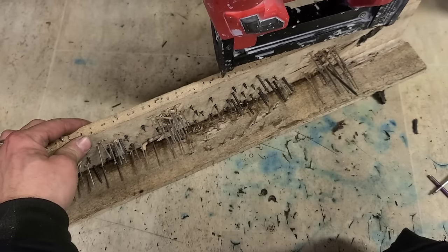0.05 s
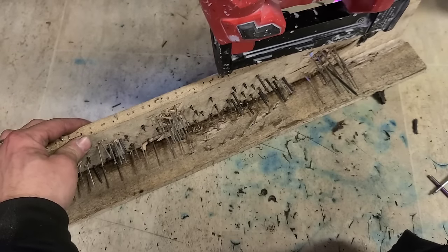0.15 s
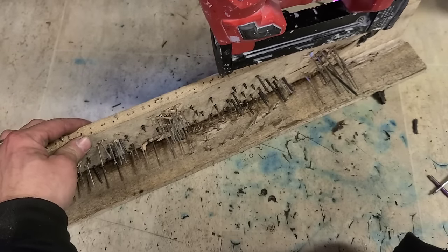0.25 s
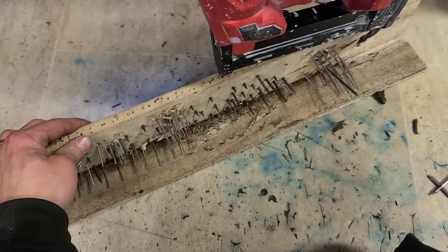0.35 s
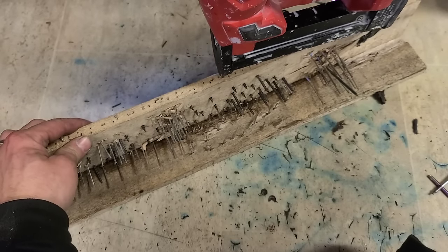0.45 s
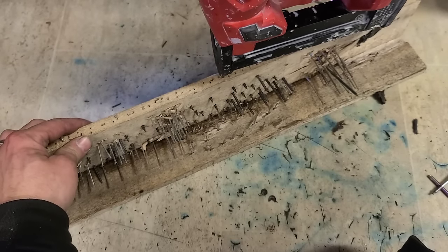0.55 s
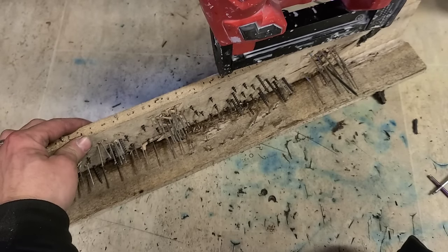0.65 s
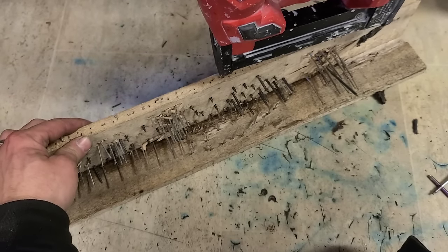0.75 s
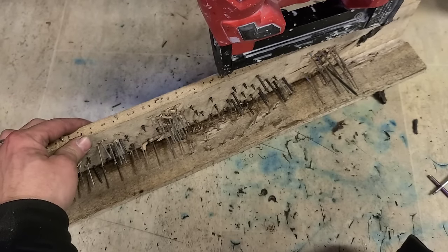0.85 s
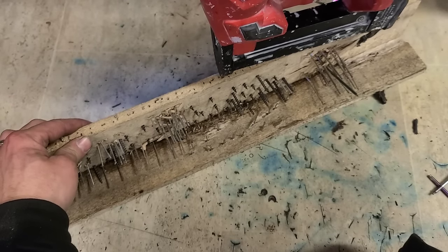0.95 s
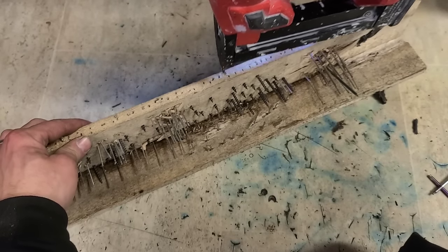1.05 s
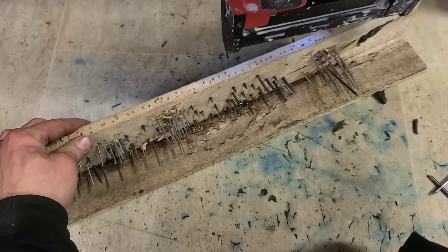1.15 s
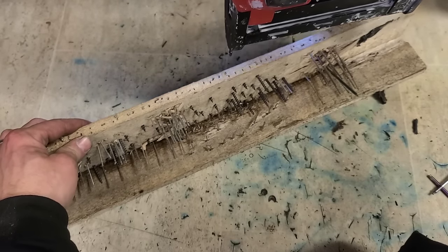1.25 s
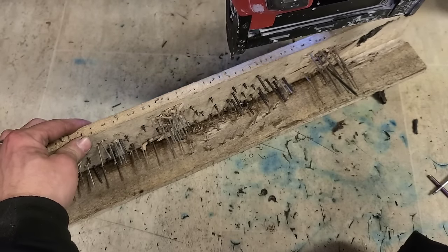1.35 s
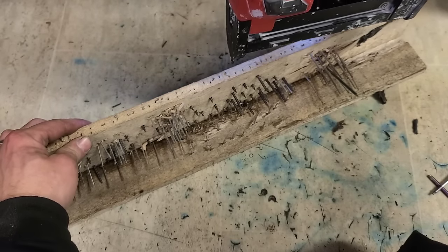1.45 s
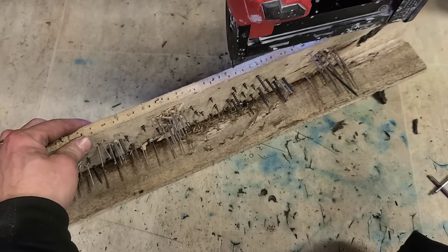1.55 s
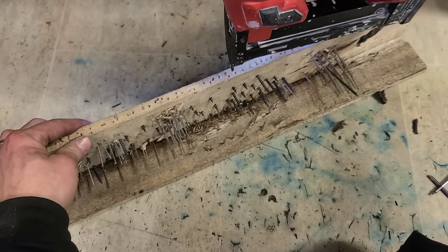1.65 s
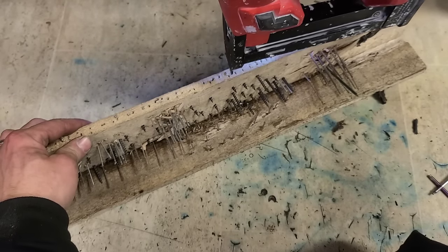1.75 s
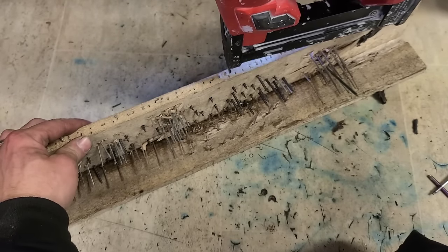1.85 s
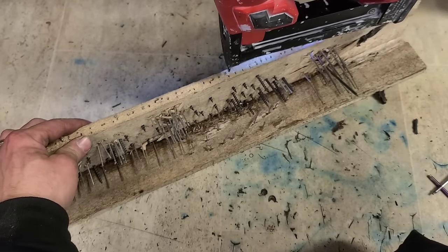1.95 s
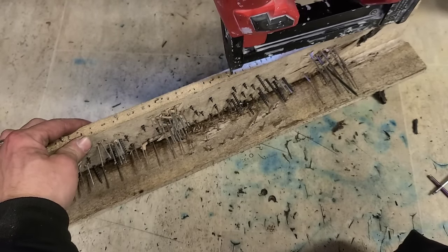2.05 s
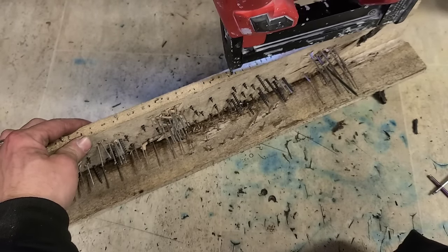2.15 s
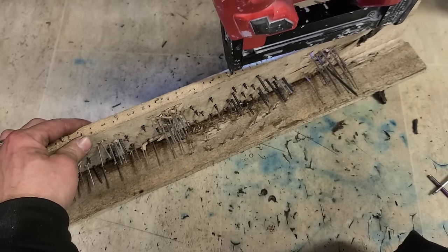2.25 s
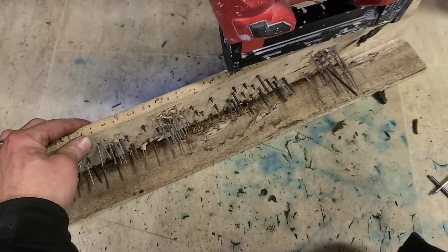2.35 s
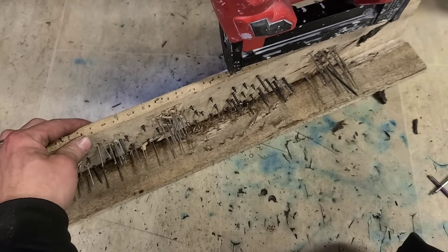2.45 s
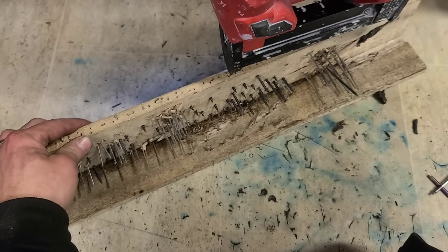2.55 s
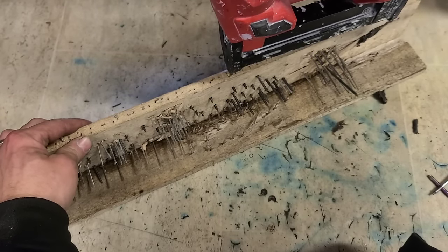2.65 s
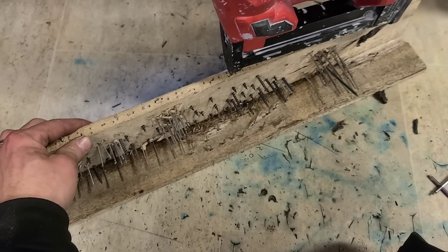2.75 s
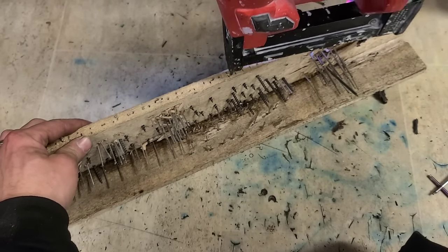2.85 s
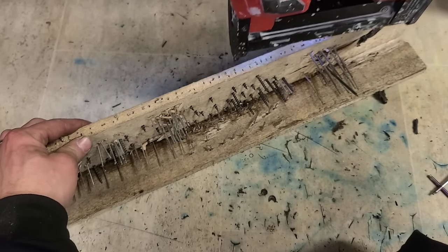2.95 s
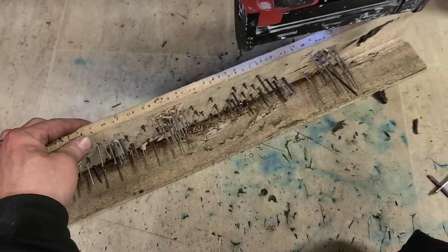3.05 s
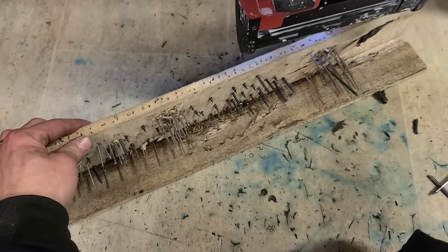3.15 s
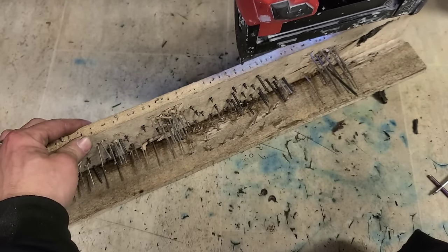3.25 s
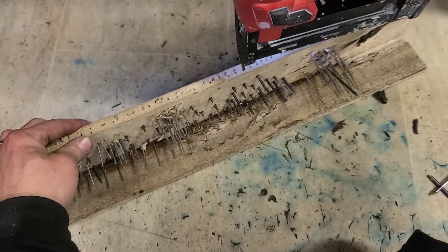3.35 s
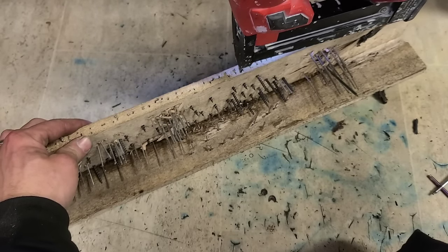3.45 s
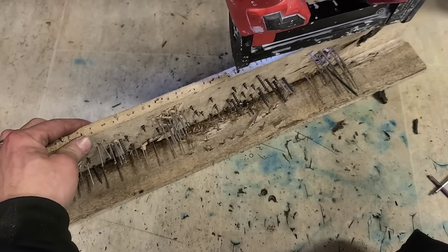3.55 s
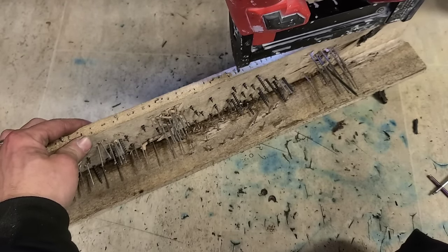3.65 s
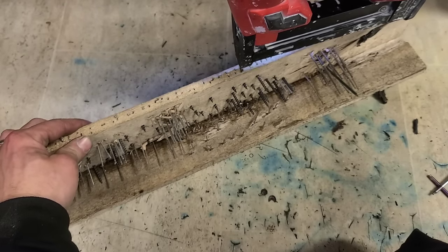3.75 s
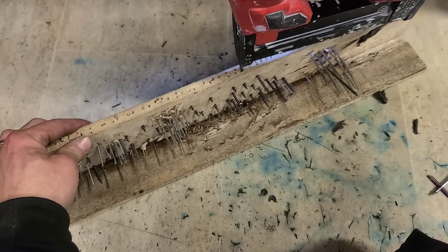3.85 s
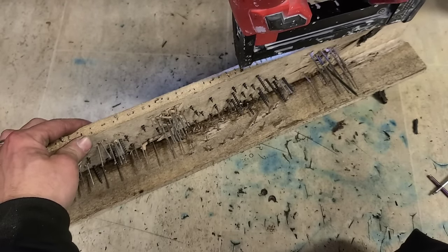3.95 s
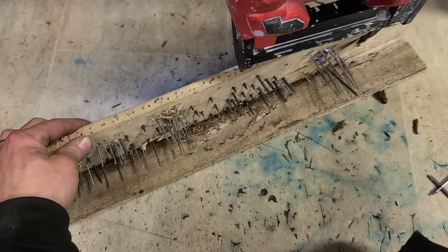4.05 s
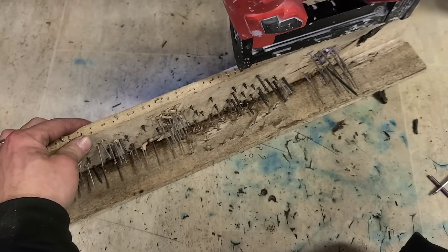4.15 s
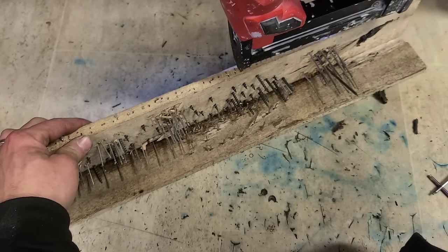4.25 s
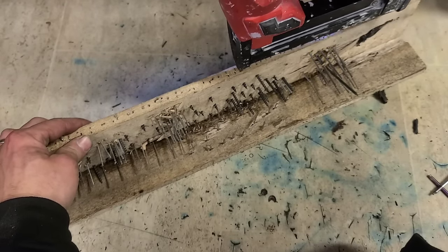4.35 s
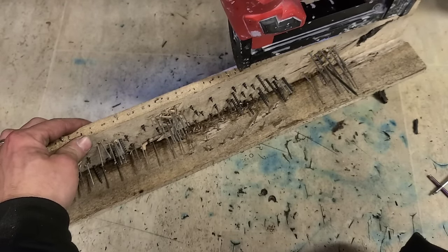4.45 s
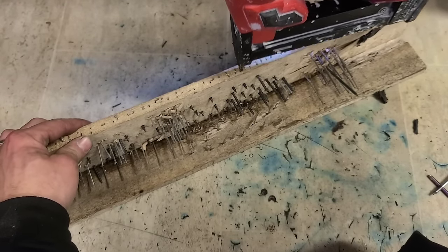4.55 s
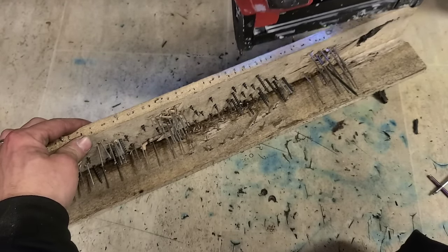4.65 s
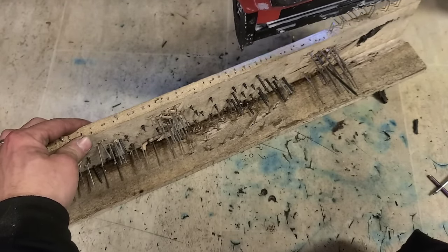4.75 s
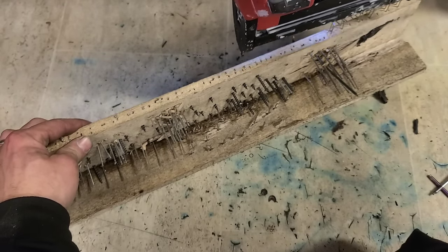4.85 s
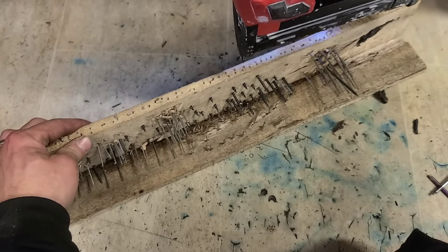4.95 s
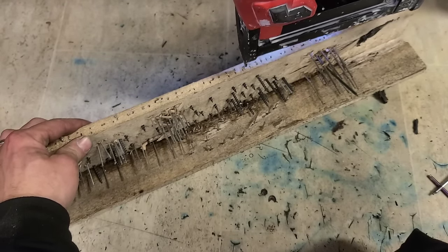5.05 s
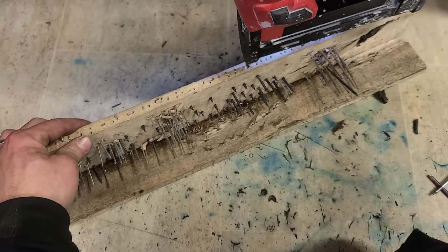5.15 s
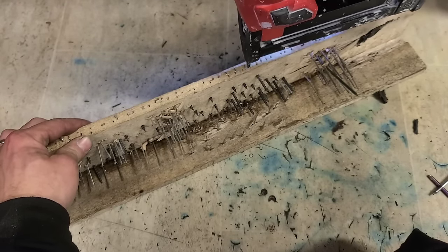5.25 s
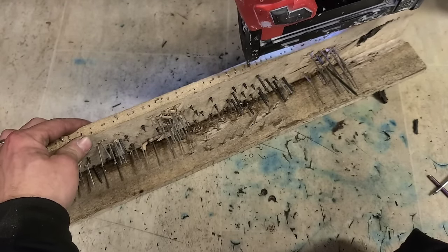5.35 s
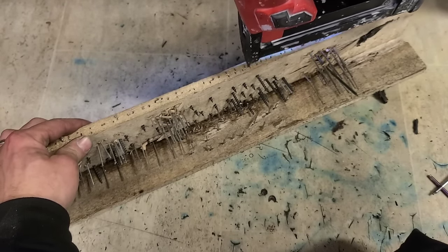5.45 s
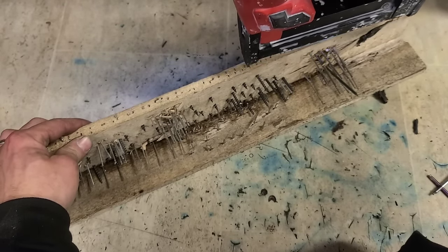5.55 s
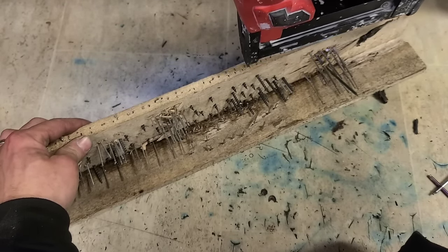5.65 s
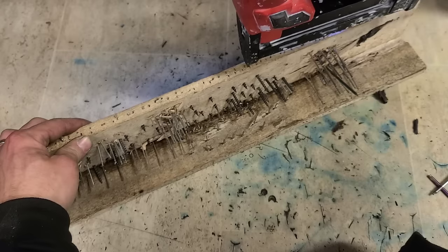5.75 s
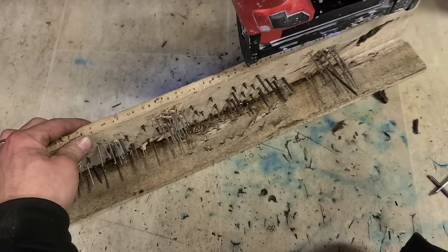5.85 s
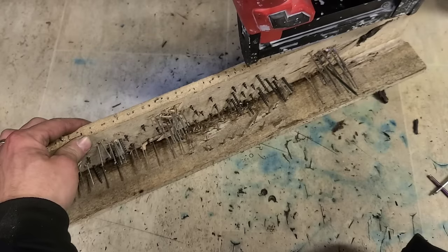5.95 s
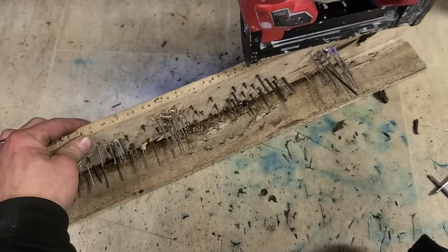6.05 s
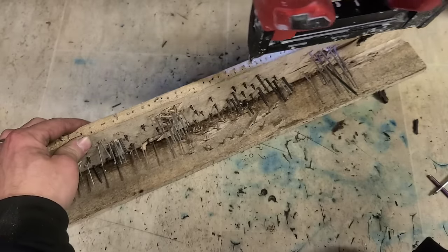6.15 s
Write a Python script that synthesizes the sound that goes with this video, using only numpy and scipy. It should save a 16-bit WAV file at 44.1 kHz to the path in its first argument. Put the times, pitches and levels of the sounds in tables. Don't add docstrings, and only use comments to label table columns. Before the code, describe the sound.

A cordless stapler works close to a stereo microphone in a workshop. Faint air noise, slightly stirred by a sleeve at first, and a distant fan hum run throughout. At 0.14 s the nose lands on a board with a low bench boom and crisp clicks; small ticks precede the first and loudest shot at 0.72 s. It is a tight double metallic crack with rattle and a deep thud, then a gear whirr drooping and straining for about 0.15 s, ending in a tiny catch and thin steel ring. The trigger snaps back at 1.04 s. A pause, then a firm clattering landing at 2.29 s, shot at 2.61 s, release click at 2.9 s. A softer landing at 4.0 s leads to a shot at 4.3 s and click at 4.56 s. The lightest landing at 5.48 s precedes the last shot at 5.8 s and a final click at 6.12 s. Each shot leaves a short room echo.

```python
import sys
import numpy as np
from scipy import signal
from scipy.fft import rfft, irfft
from scipy.io import wavfile
from scipy.ndimage import uniform_filter1d

SR = 44100
rng = np.random.default_rng(int(sys.argv[2]) if len(sys.argv) > 2 else 0)


def output_pcm(signal):
    pcm = np.clip(np.atleast_2d(signal).T, -1, 1) * 32767
    wavfile.write(sys.argv[1], SR, np.round(pcm).astype(np.int16))


def magnitude_from_level(level_db):
    exponent = np.asarray(level_db, float) / 20
    return 10 ** exponent


N = 273854
LEAD_IN = .08


# (driver release [s], level [dB], left-right [dB])
SHOTS = [
    (.722, -1.5, 0),
    (2.608, -3, -1),
    (4.297, -3.5, -0.5),
    (5.801, -4, -0.5),
]


def fire_shots(tool, boom):
    for s, db, pan_db in SHOTS:
        add(tool, s - LEAD_IN, magnitude_from_level(db) * sides(pan_db) * mechanism())
        strike_steel(tool, s, db)
        jolt_bench(boom, s, db)


# (frequency [Hz], level [dB per Hz])
RATTLE = [(500, -28), (800, -5.5), (1040, -6.5), (1400, -3), (1990, -2), (2900, -4), (4360, -6.5),
          (6000, -10), (7800, -30)]
# (frequency [Hz], width [Hz], level [dB])
MAGAZINE = [(1335, 230, 0), (1440, 43, -2), (1711, 73, -4), (2220, 58, -3), (2490, 13, -4), (2810, 67, -2),
            (3110, 240, -2), (4510, 42, -8), (5640, 100, -8), (6260, 230, -8), (7220, 45, -9),
            (7630, 31, -12)]
# (frequency [Hz], level [dB per Hz])
HISS = [(2060, -30), (3500, 2), (4410, -7), (5080, -5), (6010, -6.5), (6660, -1), (9190, -8.5),
        (14900, -7.5), (16300, -32.5)]
# (time after release [s], rate [Hz])
MESH = [(.015, 748.8), (.04, 1301), (.06, 2001), (.08, 1780), (.125, 1630), (.142, 1572), (.164, 1550),
        (.18, 1243)]
# (frequency [Hz], width [Hz], level [dB])
HOUSING = [(1200, 500, -4), (1600, 1100, -4), (1760, 450, -5), (3250, 770, -1.5), (3870, 330, -8),
           (5650, 330, -2.5), (6570, 320, -1), (7880, 200, -2), (9600, 230, -6.5), (9000, 28000, -15)]


def mechanism():
    t = np.arange(-LEAD_IN, .202, 1 / SR)
    size = len(t)
    rattle, hiss, gear = effort(t)
    grit = magnitude_from_level(2.5 * wander(size, 30)) * magnitude_from_level(2.5 * wander(size, 150))

    def rattle_gain(hz):
        plates = sum(bell(hz, f, w) ** 2 for f, w, _ in MAGAZINE)
        return magnitude_from_level(read(RATTLE, hz)) * (1 + plates)

    out = rattle * grit * noise(size, rattle_gain)
    out += hiss * grit * noise(size, lambda hz: magnitude_from_level(read(HISS, hz)))

    growl = magnitude_from_level(-5) * np.clip(t / SURGE_END_S, 0, 1) ** 3 * magnitude_from_level(-START_SURGE_DB * (t < SURGE_END_S) / 2)
    out += gear * growl * noise(size, lambda hz: bell(hz, 380, 450) ** 2)

    mesh = np.interp(t, *np.transpose(MESH)) * (1 + .004 * wander(size, 150))
    turns = np.cumsum(mesh) / SR
    for k in range(1, 11):
        housing = sum(magnitude_from_level(db) * bell(k * mesh, f, w) ** 2 for f, w, db in HOUSING)
        wobble = magnitude_from_level(3.0 * wander((2, size), 400))
        phase = 2 * np.pi * k * turns
        out += gear * housing * wobble * np.array([np.cos(phase), np.sin(phase)])
    return out


START_SURGE_DB, SURGE_END_S = 9, .049
# (time after release [s], rattle [dB], air hiss [dB])
IMPACTS = [
    (.002, -15, -15.5),
    (.008, -11, -12.5),
    (.042, -13, -13),
    (.047, -8, -9),
    (0.0502, -11, -12),
    (.17, -28, -24),
]


def effort(t):
    fall = 3000
    stop_s, load_s, unload_s = .172, 0.13, 0.1625
    steady = hump(t, 0, 0.039, stop_s, fall, 1502)
    rush = hump(t, 0, .04, .04, 400.5, fall) * (t > 0)
    creep = hump(t, -55, 0, 0, 300, fall)
    rattle = creep + magnitude_from_level(-13) ** 2 * rush + magnitude_from_level(-23.5) ** 2 * steady
    hiss = creep * magnitude_from_level(-5.5) + magnitude_from_level(-18) ** 2 * rush + magnitude_from_level(-25.5) ** 2 * steady
    for s, rattle_db, hiss_db in IMPACTS:
        rattle = rattle + hump(t, rattle_db, s, s, 9001, fall)
        hiss = hiss + hump(t, hiss_db, s, s, 9001, fall)
    load_db = -26.5 + 158.5 * np.clip(t - load_s, 0, unload_s - load_s)
    load_db = load_db + START_SURGE_DB * np.clip((SURGE_END_S - t) / 0.0047, 0, 1)
    gear = hump(t, load_db, 0.031, unload_s, 1199.5, 1499)
    return np.sqrt([rattle, hiss, gear])


# (frequency [Hz], t60 [s], level [dB], polarity)
BLADE = [(1500, 0.033, 0, -1), (2070, .03, -3, 1), (1270, .04, -5, 1)]
# (time after release [s], level [dB])
BLADE_HITS = [
    (.007, -13),
    (.038, -15),
    (.0465, -9),
]
# (frequency [Hz], t60 [s], level [dB], polarity)
ROD = [(3230, .3, -3, 1), (3290, .25, -4, -1), (7880, .3, 0, 1), (7960, .28, -2, -1), (9420, .28, -3, 1)]
# (time after release [s], level [dB])
PINS = [
    (.124, -20.5),
    (.146, -23.5),
    (.167, -25),
]


def strike_steel(tool, s, db):
    blade, rod = ring(BLADE, .0002, .0004), ring(ROD, 1 / SR, .01)
    add(tool, s + .15, magnitude_from_level(db - 41) * np.array([rod, np.roll(rod, 2)]))
    for after, hit_db in BLADE_HITS:
        add(tool[0], s + after, magnitude_from_level(db + hit_db) * blade)
        add(tool[1], s + after + .00008, magnitude_from_level(db + hit_db) * blade)
    for after, pin_db in PINS:
        add(tool, s + after, pin_click(db + pin_db))


def pin_click(db):
    t = np.arange(1500) / SR
    envelope = magnitude_from_level(db - 60 * t / 0.083) * (1 - np.exp(-t / 0.00041))
    return envelope * noise(len(t), lambda f: bell(f, 13600, 3800) ** 2)


# (time after release [s], board level [dB], bench level [dB])
BLOWS = [
    (.039, -21.5, -40),
    (.047, -18.5, -7.5),
    (.158, -44, -49),
    (.178, -49, -23.5),
    (0.236, -54, -37),
]
# (frequency [Hz], t60 [s], level [dB], polarity)
JOLTED = [(52, .2, -8, 1), (78.7, .22, 0, 1), (99, .3, -14, 1), (108, .35, -19, -1), (131, .21, -4, 1),
          (157, .08, -2, 1), (161, .2, -6, -1)]
# (frequency [Hz], t60 [s], level [dB], polarity)
BOARD = [(210, 0.31, -5.5, 1), (300.7, 0.2, -2, -1), (378.4, 0.08, -0.5, 1), (492, 0.05, 0.5, -1),
         (520, 0.021, -4, 1), (705, 0.096, -9, 1)]
# (frequency [Hz], t60 [s], level [dB], polarity)
RECOIL = [(118, .04, 0, 1), (470, .04, -2, 1), (185, .65, -27, 1)]
# (frequency [Hz], t60 [s], level [dB], polarity)
SWAY = [(30.48, 1.2, 0.0021, 1), (35.15, 0.88, 0.00073, 1)]


def jolt_bench(boom, s, db):
    jolted, board = ring(JOLTED, 0.0026, 0.0091), ring(BOARD, .0006, 0.00057)
    recoil, sway = ring(RECOIL, .001, 0.0012), ring(SWAY, .004, .03)
    add(boom, s + .0403, magnitude_from_level(db) * (magnitude_from_level(-8) * recoil + magnitude_from_level(-31) * sway))
    for after, board_db, bench_db in BLOWS:
        add(boom, s + after, magnitude_from_level(db) * (magnitude_from_level(board_db) * board + magnitude_from_level(bench_db) * jolted))


# (frequency [Hz], t60 [s], level [dB], polarity)
PRESSED = [(56, .22, -1, 1), (64.4, .35, -10, -1), (76.3, .17, 0, -1), (89, .21, -13, 1),
           (129, .17, -16, -1), (185, .2, -26, 1)]
# (time [s], peak level [dB])
LANDINGS = [(0.056, -34), (0.141, -8.5), (0.594, -37), (0.658, -32), (1.046, -34), (2.081, -30.5),
            (2.291, -8), (2.561, -27.5), (2.906, -38.5), (3.817, -40), (3.93, -38.5), (4.007, -11.5),
            (4.258, -35), (4.572, -35.5), (5.337, -43), (5.409, -43), (5.482, -13.5), (5.55, -47),
            (5.718, -32), (6.117, -31.5)]


def set_down(boom, ticks):
    pressed, sway = ring(PRESSED, .004, 0.00062), ring(SWAY, .004, .03)
    for s, db in LANDINGS:
        add(boom, s + 0.0016, magnitude_from_level(db + 0.7) * (pressed + magnitude_from_level(-25.5) * sway))
        add(ticks, s + 0.0033, knock(db - 23.5))


def knock(db):
    t = np.arange(9000) / SR

    def wood(f):
        return bell(f, 180, 160) ** 2 + .6 * bell(f, 330, 170) ** 2 + 0.35 * bell(f, 920, 450) ** 2

    return magnitude_from_level(db - 60 * t / 0.26) * (1 - np.exp(-t / 0.0012)) * noise(len(t), wood)


# (peak level [dB], pitch [Hz], treble share [dB])
TRIGGER = [
    (-44, 3000, 2),
    (-33, 2300, -5),
    (-39, 3400, 4.5),
]
TRIGGER_S = (.0445, .0335, .0205)
# (time [s], peak level [dB], pitch [Hz])
LET_GO = [
    (1.041, -31, 2950),
    (2.8968, -30.5, 4770),
    (4.563, -28.5, 2947),
    (6.121, -29, 2900),
]
# (time [s], peak level [dB], pitch [Hz], left-right [dB])
CLICKS = [(.128, -35, 2820, 0), (.1448, -23, 2130, -1.5), (.1535, -24, 2880, 0), (.5922, -40, 1110, -2),
          (.6304, -53, 1107, 3), (.6601, -36, 1158, 0), (.667, -39.5, 2970, 2), (1.0572, -32.5, 1500, -4),
          (2.0665, -52, 2255, 4), (2.1261, -42, 1374, 2.5), (2.281, -32, 2500, 1.5), (2.311, -31, 1049, 11),
          (2.5348, -38, 1960, -1), (2.5642, -30.5, 2005, -1.5), (3.81, -40, 3110, -1),
          (4.2317, -44, 1110, 6), (5.2555, -50, 1447, 3.5), (5.439, -52, 3250, 1), (5.462, -43, 3030, -0.5),
          (5.7379, -49, 1960, -11)]
# (time [s], peak level [dB], pitch [Hz], left-right [dB])
TAPS = [(.0425, -54, 1040, 4), (.0672, -44.5, 1200, 1.5), (.1744, -38, 1030, 3.5), (.186, -50, 3280, 1),
        (.2107, -43, 1004, 2.5), (.6427, -43, 1206, -1), (2.0852, -37, 2980, -2.5),
        (2.2465, -40.5, 1289, 8), (2.2665, -34.5, 2137, -5), (2.2945, -16, 2610, -5),
        (2.33, -52.5, 1380, 1), (2.3603, -49.5, 1048, -6.5), (3.3496, -57, 2490, -1),
        (3.8452, -47.5, 2744, -1.5), (3.932, -41, 1270, 0.5), (3.9995, -35.5, 3120, -3.5),
        (4.012, -26, 2220, -5.5), (4.0244, -36, 991, 10), (4.05, -49, 1140, -2.5),
        (4.0741, -41.5, 2280, 2.5), (4.0902, -53, 1367, 3.5), (5.3413, -61.5, 1360, 5.5),
        (5.4147, -37, 1280, 3.5), (5.4854, -28, 1152, -3), (5.5044, -33.5, 2700, 1.5),
        (5.531, -47.5, 3300, 0), (5.7164, -42, 1210, 3)]


def small_parts():
    out = np.zeros((2, N))
    for s, _, _ in SHOTS:
        for before, (db, hz, treble_db) in zip(TRIGGER_S, TRIGGER):
            add(out, s - before, tick(db, hz, treble_db, .028, 0))
    for s, db, hz in LET_GO:
        add(out, s, tick(db, hz, -2, .045, 0))
        add(out, s + .016, tick(db - 4, 1700, 3, .035, 0))
    for rows, treble_db, t60 in (CLICKS, -12, 0.059), (TAPS, -28, .045):
        for s, db, hz, pan_db in rows:
            scrape_t60 = t60 * np.exp(-.03 * (db + 41))
            add(out, s, tick(db, hz, treble_db, scrape_t60, pan_db))
    return out


def tick(db, hz, treble_db, t60, pan_db):
    t = np.arange(4000) / SR
    top_hz = 5000 + 12000 * magnitude_from_level(1.2 * min(treble_db, 0))

    def plastic(f):
        clack = 0.37 * f / (f + 500) / (1 + (f / 3700) ** 8)
        return bell(f, hz, 340) ** 2 + clack + 0.32 * bell(f, 3140, 280) ** 2

    body = noise(len(t), plastic)
    snap = noise(len(t), lambda f: (f > 4000) / (1 + (f / top_hz) ** 6))
    grit = magnitude_from_level(3.6 * wander(len(t), 80))
    crack = 0.5 * magnitude_from_level(-60 * t / 0.0046)
    burst = 0.54 * magnitude_from_level(-60 * t / max(1.9 * t60, .01))
    envelope = (1 - np.exp(-t / 0.00056)) * (crack + burst)
    return magnitude_from_level(db - 4.0) * sides(pan_db) * grit * envelope * (body + magnitude_from_level(treble_db) * snap)


# (frequency [Hz], t60 [s])
SHOP = [(60, 0.42), (250, 0.44), (1000, 0.27), (4000, 0.31), (12000, 0.2)]


def shop_echo(x):
    hz, t, z = signal.stft(noise(SR, lambda f: 1 + 0 * f), SR, nperseg=256)
    decay = magnitude_from_level(-60 * t / read(SHOP, hz)[:, None])
    tail = signal.istft(z * decay, SR, nperseg=256)[1]
    tail = tail * np.clip(np.arange(tail.shape[1]) / SR / 0.032, 0, 1)
    return signal.fftconvolve(x, tail / np.linalg.norm(tail[0]), axes=1)[:, :N]


def rocking():
    jolts, t = np.zeros(N), np.arange(SR) / SR
    swing = ((1 - np.exp(-t / .06)) * magnitude_from_level(-60 * t / .7)) ** 2
    events = [(s, -44 + .3 * db) for s, db in LANDINGS]
    events += [(s, -52 + db) for s, db, _ in SHOTS]
    for s, db in events:
        add(jolts, s, magnitude_from_level(db) ** 2 * swing / swing.max())
    return np.sqrt(jolts)


# (time [s], added to the air noise [dB])
STIR = [
    (0, 8),
    (.6, 8),
    (1.2, 1.5),
    (6.21, -2.5),
]
# (frequency [Hz], level [dB per Hz])
AIR = [(20, -7.5), (35, -4), (80, -6), (130, -23.5), (170, -23), (300, -19), (600, -26), (1200, -27.5),
       (3000, -36.5), (6700, -52), (9000, -54), (15500, -54.5)]
# (frequency [Hz], width [Hz], level [dB])
HUM = [(253, 110, -6), (377, 78, -7), (727.6, 40, -4.5), (815, 76, -13.5), (1040, 20, -9), (1360, 60, -16)]
# (frequency [Hz], width [Hz], level [dB])
FAN = [(103, 0.87, -61), (256.3, 6.2, -66), (334.6, 2.5, -67), (408, 2.6, -77.5), (500, 0.73, -74.5),
       (706, 6, -82.5), (1090, 6.3, -84.5)]


def background():
    t = np.arange(N) / SR
    stir_db = np.interp(t, *np.transpose(STIR))
    out = magnitude_from_level(-62.5 + stir_db) * noise(N, lambda hz: magnitude_from_level(read(AIR, hz)) * (hz > 20))
    out += magnitude_from_level(-64) * noise(N, lambda hz: sum(magnitude_from_level(db) * bell(hz, f, w) ** 2 for f, w, db in HUM))
    for f, w, db in FAN:
        turns = np.cumsum(f + w * wander(N, 4000)) / SR
        out += magnitude_from_level(db + 3.0) * np.cos(2 * np.pi * turns + np.array([[0], [f / 700]]))
    out += magnitude_from_level(-84 + .5 * stir_db) * noise(N, lambda hz: bell(hz, 10000, 500))
    return out + rocking() * noise(N, lambda hz: bell(hz, 30, 48) ** 2)


# (frequency [Hz], left-right likeness [0-1])
SAME = [(150, .97), (380, .8), (950, 0.11), (2400, 0.0054)]


def noise(size, gain):
    hz = np.fft.rfftfreq(size, 1 / SR)
    left, other = rfft(rng.standard_normal((2, size)))
    same = np.clip(read(SAME, hz), -1, 1)
    right = same * left + np.sqrt(1 - same ** 2) * other
    return evened(irfft(np.array([left, right]) * gain(hz), size))


def ring(modes, push_s, rise_s):
    t = np.arange(SR) / SR
    out = 0
    for hz, t60, db, sign in modes:
        out = out + np.sign(sign) * magnitude_from_level(db - 60 * t / t60) * np.sin(2 * np.pi * hz * t)
    push = np.hanning(round(push_s * SR))
    return np.convolve(out * (1 - np.exp(-t / rise_s)), push / push.sum())[:SR]


def hump(t, top_db, start_s, end_s, rise_db_per_s, fall_db_per_s):
    rise_db = rise_db_per_s * np.maximum(start_s - t, 0)
    fall_db = fall_db_per_s * np.maximum(t - end_s, 0)
    return magnitude_from_level(top_db - rise_db - fall_db) ** 2


def bell(hz, centre_hz, width):
    return 1 / np.sqrt(1 + (2 * (hz - centre_hz) / width) ** 2)


def wander(shape, size):
    return evened(uniform_filter1d(rng.standard_normal(shape), size=size))


def evened(x):
    return x / np.sqrt(np.mean(x ** 2) + 1e-20)


def read(points, hz):
    f, value = np.transpose(points)
    return np.interp(np.log(hz + 1), np.log(f + 1), value)


def sides(pan_db):
    return magnitude_from_level(np.array([[pan_db / 2], [-pan_db / 2]]))


def add(mix, s, sound):
    part = mix[..., round(s * SR):][..., :sound.shape[-1]]
    part += sound[..., :part.shape[-1]]


def scene():
    tool, ticks, boom = np.zeros((2, N)), small_parts(), np.zeros((1, N))
    fire_shots(tool, boom)
    set_down(boom, ticks)
    echo = shop_echo(magnitude_from_level(-16) * tool + magnitude_from_level(-21.5) * ticks + magnitude_from_level(-12.5) * boom)
    return tool + ticks + boom + echo + background()


def low_pass(x):
    return signal.sosfilt(signal.butter(12, 16450, fs=SR, output="sos"), x)


def record(dry):
    squeezed = dry / (1 + np.abs(dry / 1.05) ** 4) ** .25
    band_edge = signal.firwin(255, 15950, fs=SR)[None]
    mix = signal.oaconvolve(squeezed, band_edge, "same")
    return low_pass(mix)


dry = scene()
out = record(dry)
output_pcm(out)
```